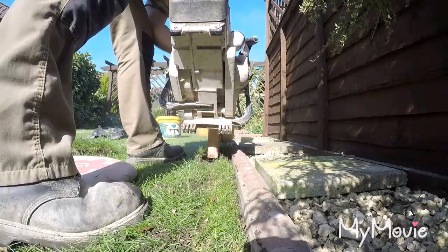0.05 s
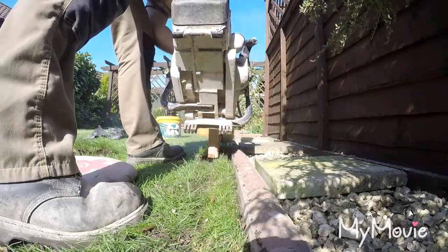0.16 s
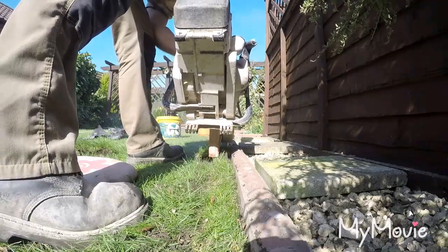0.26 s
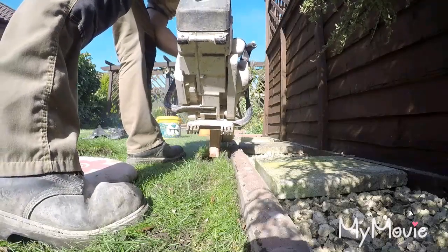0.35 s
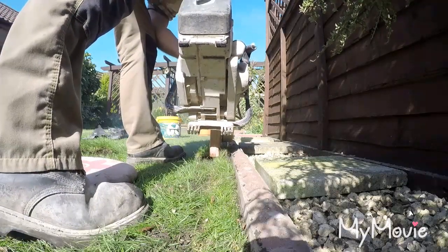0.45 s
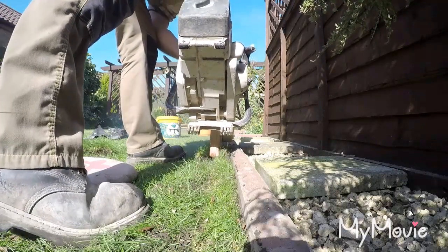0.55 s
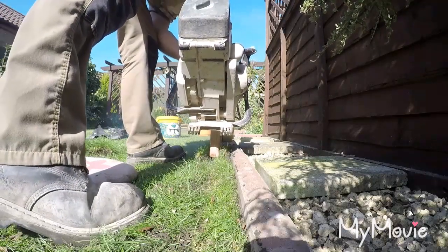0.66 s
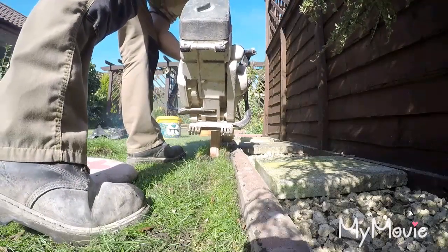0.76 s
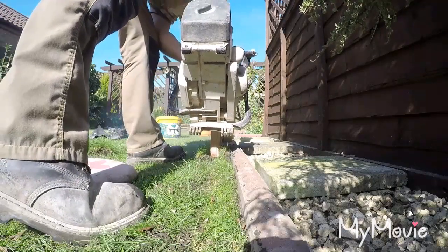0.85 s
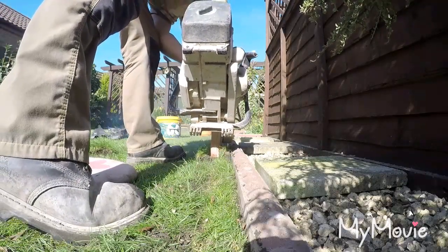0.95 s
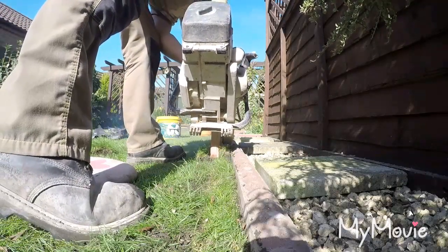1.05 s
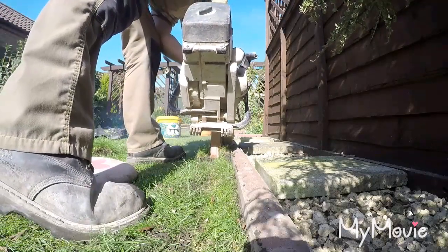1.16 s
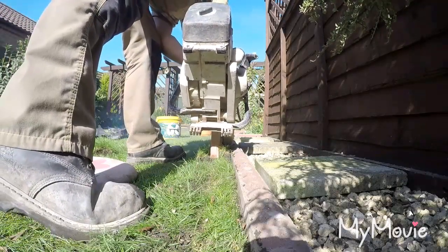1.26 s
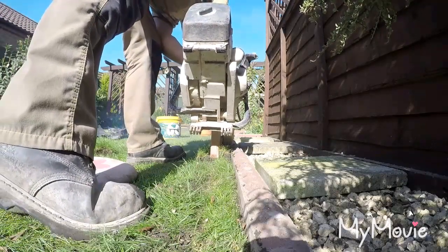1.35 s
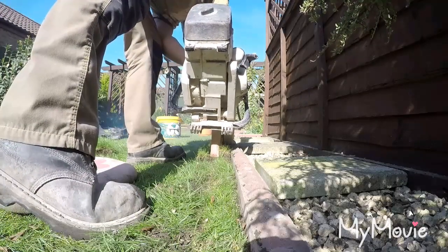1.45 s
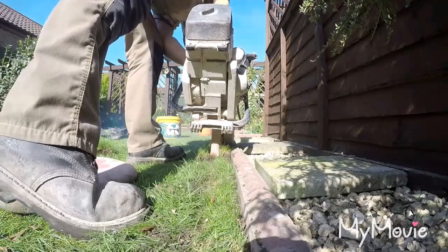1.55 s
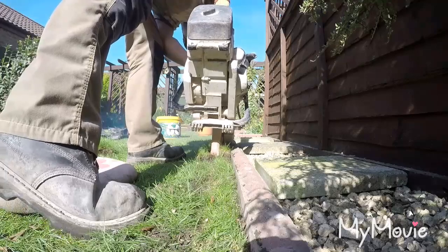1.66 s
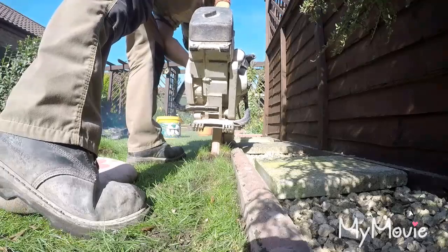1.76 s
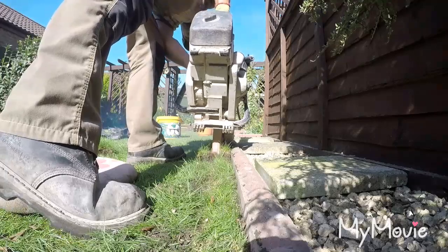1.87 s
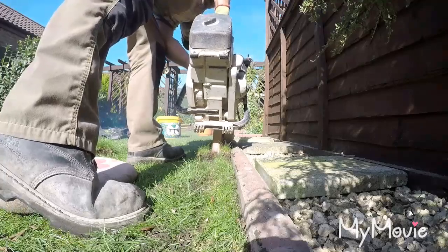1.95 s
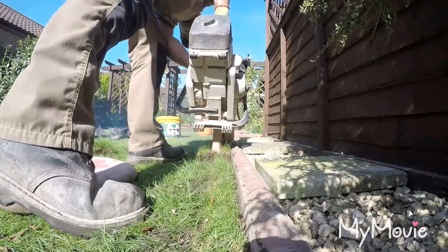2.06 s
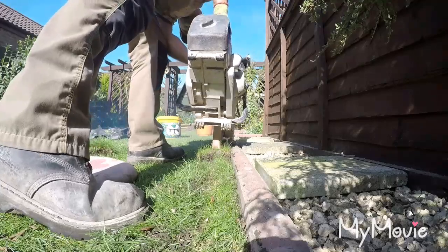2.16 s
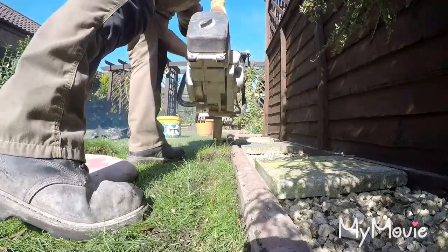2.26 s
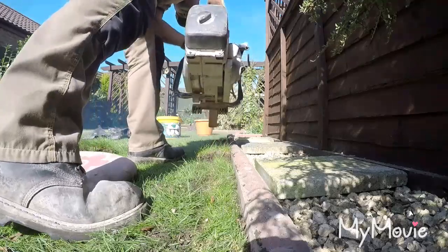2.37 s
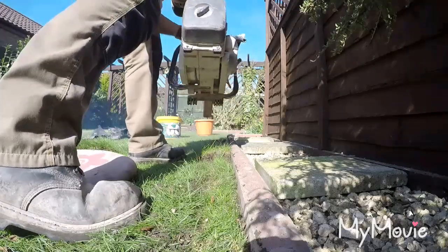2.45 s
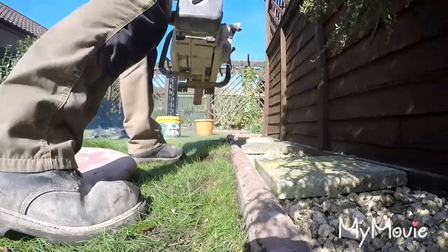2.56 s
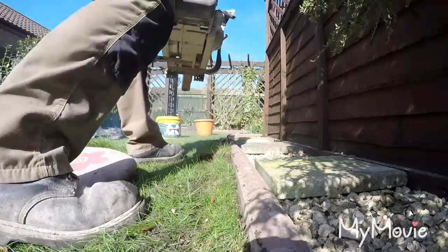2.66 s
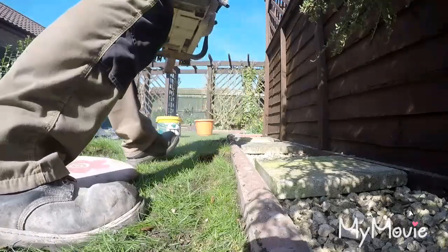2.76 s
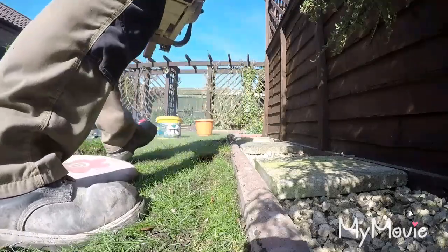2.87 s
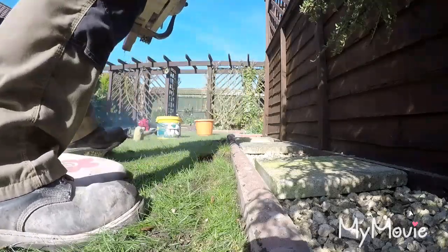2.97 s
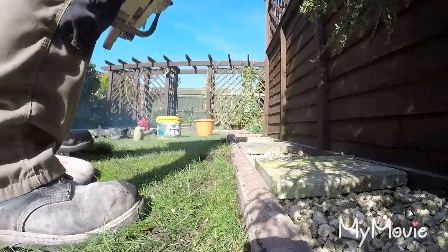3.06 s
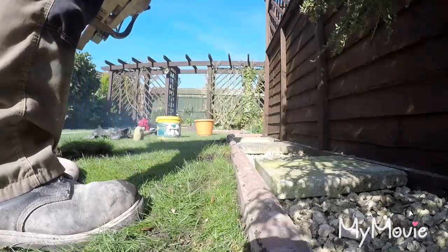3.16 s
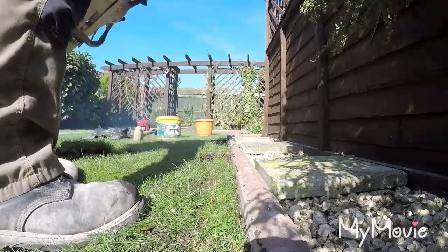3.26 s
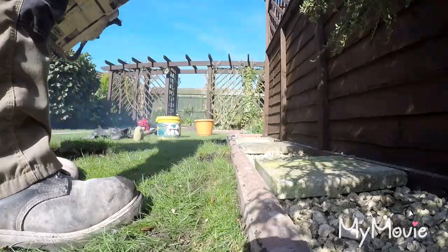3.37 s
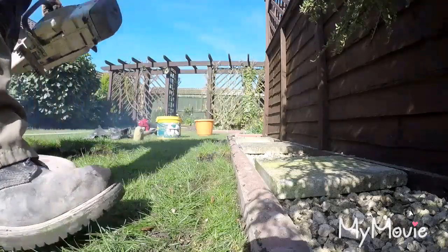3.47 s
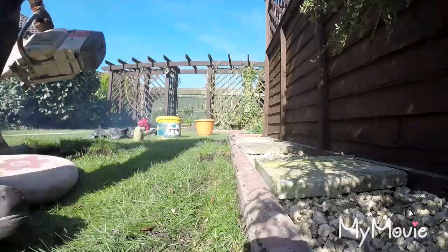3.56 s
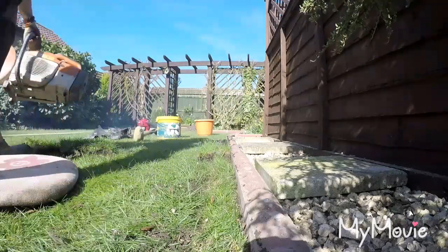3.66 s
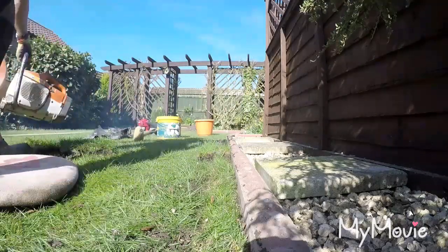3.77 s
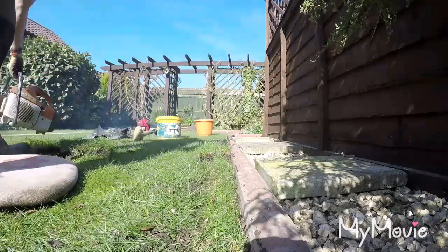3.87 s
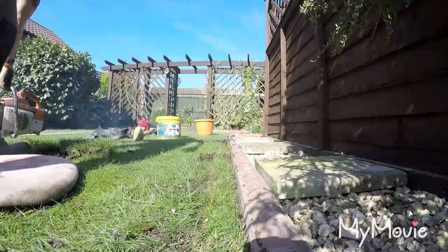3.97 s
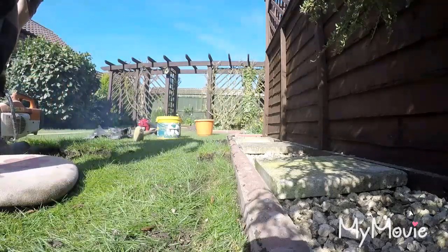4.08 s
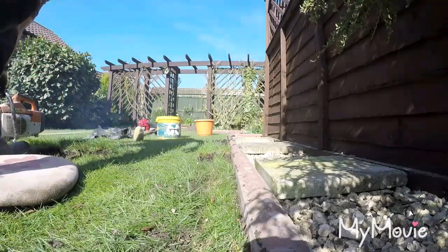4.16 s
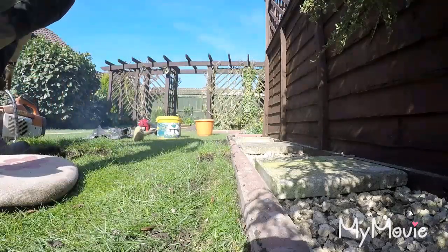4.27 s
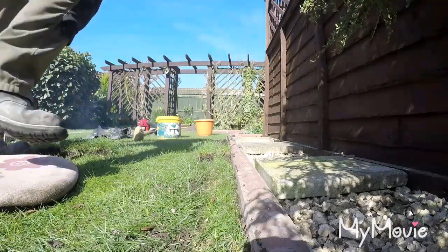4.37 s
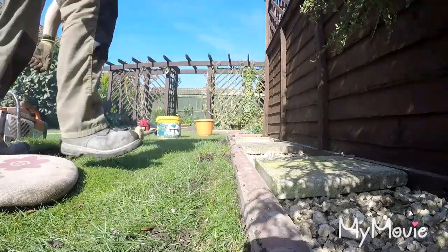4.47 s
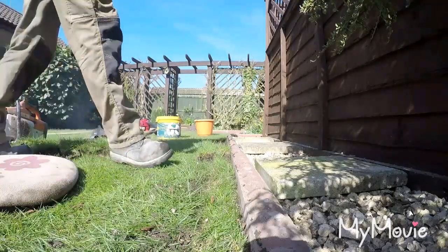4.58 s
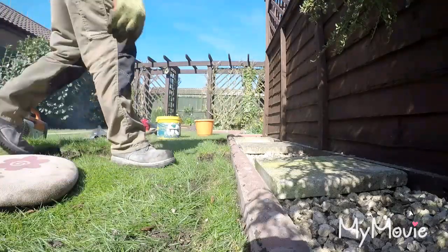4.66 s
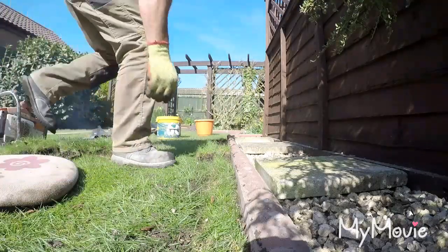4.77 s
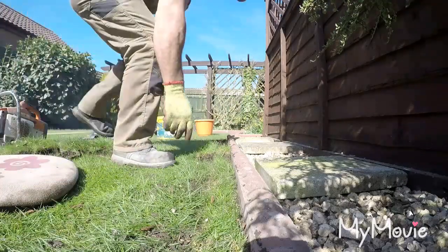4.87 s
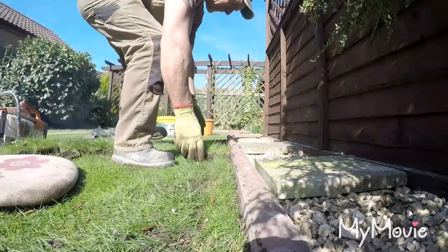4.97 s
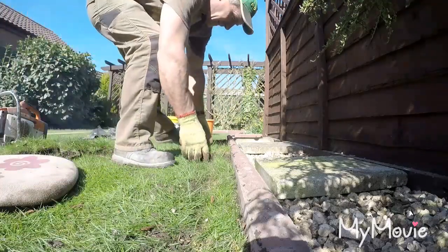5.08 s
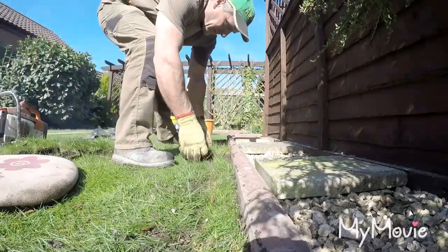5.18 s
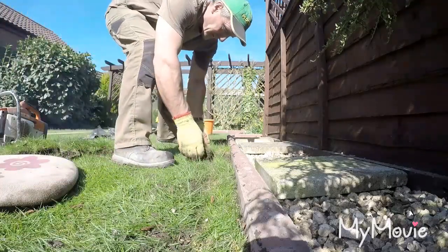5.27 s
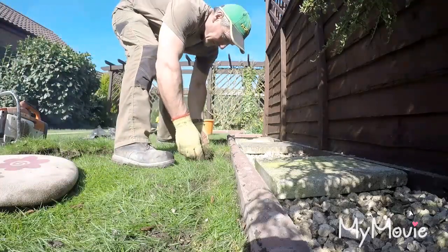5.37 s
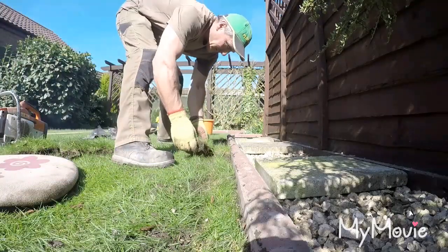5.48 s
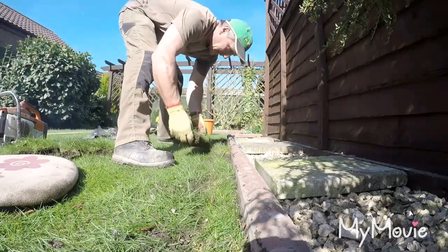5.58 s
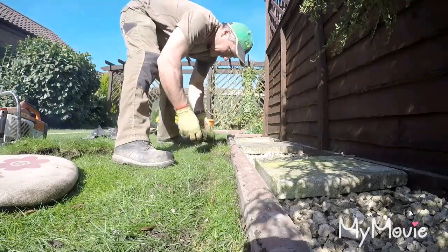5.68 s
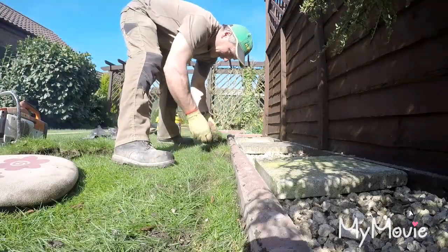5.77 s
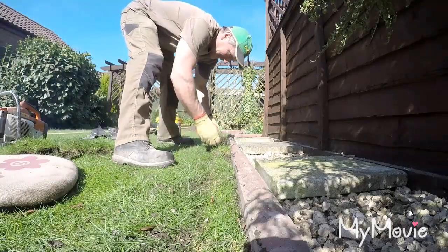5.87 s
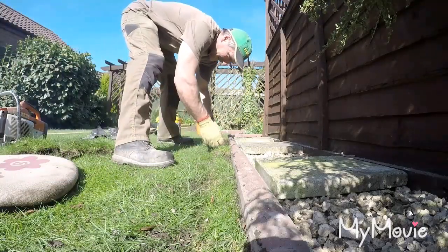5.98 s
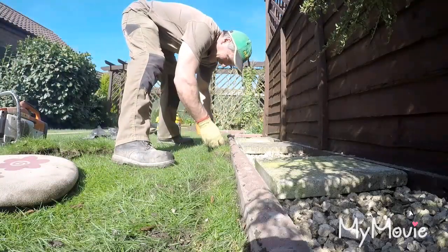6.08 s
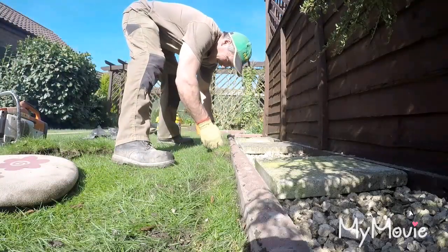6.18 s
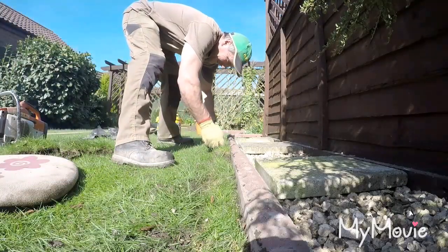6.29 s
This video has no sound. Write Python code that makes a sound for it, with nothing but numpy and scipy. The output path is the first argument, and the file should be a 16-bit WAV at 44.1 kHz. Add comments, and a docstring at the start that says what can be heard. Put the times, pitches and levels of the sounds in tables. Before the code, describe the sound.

A petrol disc cutter cuts concrete at full throttle, then winds down and idles with sharp, uneven pops.

```python
"""Two-stroke disc cutter: cut, coast, idle.

A petrol saw cuts concrete flat out by a wooden fence, firing every second turn: the exhaust barks,
the intake drones, the steel disc sings. The throttle shuts; the engine coasts unfired, puffing and
rattling, as the saw is carried aside. Left on the lawn, it idles in sharp uneven pops over a breeze."""
import sys
import numpy as np
from scipy import signal
from scipy.fft import rfft, irfft, next_fast_len
from scipy.io import wavfile

SR = 44100
rng = np.random.default_rng(int(sys.argv[2]) if len(sys.argv) > 2 else 0)


def transcribe(signal):
    """Save signal, clipped to [-1, 1], as a 16-bit WAV file at the path in sys.argv[1]."""
    frames = np.atleast_2d(signal).T
    limited = np.clip(frames, -1, 1)
    pcm = np.round(limited * 32767).astype(np.int16)
    wavfile.write(sys.argv[1], SR, pcm)


N = 279153
T = np.arange(N) / SR
TAPS = 8192
HZ = np.fft.rfftfreq(TAPS, 1 / SR)
FULL_SPEED_HZ, SHUT_S = 80, 2.14

# crank speed: t/s, f/Hz
CRANK_SPEED = [(0, 85.05), (.38, 86.12), (.62, 81.53), (.95, 80.8), (1.22, 78.37), (1.5, 81.18),
               (1.8, 85.6), (2.0, 86.32), (2.12, 89.21), (2.2, 83.73), (2.45, 75.81), (2.87, 63.84),
               (3.25, 44.81), (3.8, 30.4), (4.0, 40), (4.7, 34), (5.55, 34), (6.0, 39.5)]
# misfires at the rev limit: t/s
MISFIRES = [.111, .240, .297, 2.034, 2.067, 2.102, 2.113]
# idle firings: t/s, relative crack level/dB, relative thump level/dB
IDLE_FIRINGS = [(3.8013, -35, -45), (3.923, -24, -38), (4.122, -26, -33), (4.2571, -22, -28),
                (4.4107, -40, -37), (4.6434, -31, -32.5), (4.7592, -28.5, -31.5), (4.8456, -47, -40.5),
                (4.905, -23, -32), (5.02, -26.5, -32.5), (5.1188, -35, -44.5), (5.236, -29.5, -34),
                (5.327, -26, -31.5), (5.444, -24.5, -31.5), (5.5533, -21, -32.5), (5.6705, -20, -30),
                (5.8045, -16, -28), (5.9572, -16.5, -32.5), (6.0877, -16.5, -31.5), (6.261, -29, -34.5)]
# disc's bite over a light cut; saw facing the listener (both weighted per part): t/s, level/dB
BITE = [(0, 9.5), (.12, 10), (.21, 8.5), (.25, 1.5), (.47, 5.5), (.62, 0), (1.35, 1.5), (1.75, 7.5),
        (2.1, 1)]
FACING = [(2.4, 1.5), (2.66, -3), (2.97, 4), (3.25, 1), (3.5, 0), (3.85, -0.5), (4.12, -1), (4.7, -1.5),
          (6.2, 0)]
# coasting fan whistle: t/s, f/Hz, level/dB
FAN_WHISTLE = [(2.15, 3210, -76), (2.33, 2854, -45), (2.45, 2710, -33), (2.6, 2690, -36.5),
               (2.75, 2448, -37), (2.95, 2390, -40.5), (3.15, 2376, -44), (3.4, 2210, -62)]
# disc rasps on the swing and set-down: peak t/s, rise/s, decay/s, f/Hz, width/Hz, level/dB
SWING_RASPS = [(2.98, .14, .38, 3870, 230, -38), (3.97, 0.057, .27, 3500, 520, -43)]
# body booms on the downswing: centre t/s, half length/s, level/dB
BOOMS = [(3.629, 0.017, -38), (3.725, 0.039, -33)]
# crank harmonics: order, relative level/dB
INTAKE_ORDERS = [(1, 8), (2, 6), (3, -31), (4, -15.5), (5, -16), (6, -10.5), (7, -21)]
PUMP_ORDERS = [(3, -3), (4, 2.5), (5, -2), (6, -7), (7, -12.5), (8, -11.5), (9, -19), (10, -22.5),
               (11, -10), (12, -24), (13, -10), (14, -27), (15, -11.5)]
# exhaust spectra, flat out and idling: f/Hz, relative level/dB
EXHAUST_THUD = [(5, -19), (42, -4), (125, 2.5), (210, 0.5), (300, -6), (380, -17.5), (440, -7.5), (540, -8),
                (680, -19), (900, -13.5), (1300, -25), (2500, -40)]
EXHAUST_FRONT = [(300, -28.5), (680, -22.5), (830, 3.5), (1000, 5.5), (1230, 6), (1400, -19), (1950, -33),
                 (2400, 9.5), (3500, -5), (8000, -29)]
EXHAUST_BARK = [(300, -28), (680, -24), (850, -5.5), (1200, -7), (1400, -17), (1950, -42), (2400, 2.5),
                (3000, 1), (3900, 3), (4400, 0), (5200, 3), (6500, -9.5), (10000, -9.5), (12500, -9.5),
                (15000, -25)]
IDLE_THUMP = [(5, -45), (30, -10), (70, 7.5), (150, 0), (300, -4), (430, 0), (570, -7), (750, -18.5),
              (1200, -30), (2500, -76)]
IDLE_CRACK = [(300, 11), (800, -1.5), (1150, -4.5), (1450, -11), (2200, -7), (3300, -30), (5000, -7.5),
              (7000, -15), (8200, -10.5), (11000, -7), (15000, -12)]
# machinery and air spectra: f/Hz, relative level/dB
RATTLE_HELD = [(1060, -30.5), (1800, -8.5), (2510, -1), (2830, -4), (3180, -0.5), (3500, -5.5), (3800, -1),
               (3970, -4), (4320, -14), (4710, -6), (5360, -16), (6500, -20.5), (8450, -42), (14300, -120)]
RATTLE_ON_LAWN = [(1400, -23.5), (1900, -4), (2700, -2), (3000, -2), (3150, 11.5), (3350, -1.5),
                  (3900, 1.5), (4300, -10), (4750, 1.5), (5300, -5), (7000, -37)]
HISS = [(3000, -49), (5000, 5), (6800, 4.5), (8500, -1.5), (10000, -2.5), (12500, -1.5), (14000, -10.5),
        (16000, -38)]
CASING = [(200, -13), (450, -7), (680, -14.5), (880, -4.5), (1000, -6), (1170, 2.5), (1400, -21),
          (2600, -17.5), (5000, -47)]
SHUDDER = [(10, -53), (50, -8), (100, -9), (170, 0.5), (250, 3), (350, -2.5), (440, -4), (620, -22),
           (900, -32), (2000, -41)]
BREEZE = [(5, -35), (20, -10), (35, -5), (60, -8), (120, -10), (250, -14.5), (700, -31), (2000, -52)]
# resonances: f/Hz, half width/Hz, relative level/dB; the last casing mode is the ring of the gap by the fence
CASING_MODES = [(857, 96, -4), (1166, 120, -2.5), (1655, 53, 9)]
MUFFLER_MODES = [(1770, 49, -8), (2606, 180, 8), (3120, 81, 16.5), (3660, 170, 9.5), (4600, 140, 10.5),
                 (5590, 200, 2), (6990, 290, 6), (9650, 450, -3.5)]
DISC_MODES = [(872.4, 8.6, 1), (1706, 8.9, 3.5), (2430, 31, -2), (3244, 15, 7), (3700, 19, -6),
              (3740, 43, -8), (4015, 9.1, 8.5), (4790, 15, 5.5), (5530, 24, -1), (5550, 7.7, -18),
              (6555, 23, -7), (8380, 19, -6.5), (12360, 260, -15)]
JINGLE_MODES = [(2590, 38, -6.5), (3150, 23, 7), (3330, 15, 3.5), (3700, 17, -3), (3840, 34, 5),
                (4610, 46, -5), (5630, 28, -6), (6760, 58, -6.5)]


def exhaust(turns, rested_db=4):
    """Each firing thuds, barks and rings the casing and the gap by the fence; the fuller charge after a misfire
    hits harder."""
    times = firings(turns)
    thud_spread, blow_spread, gust_spread = rng.standard_normal((len(times), 3)).T
    gap_turns = np.r_[2, np.diff(np.interp(times, T, turns))]
    charge_db = rested_db * np.log2(gap_turns / 2)
    bite_db = np.interp(times, T, curve(BITE))
    thud = colour(clicks(times - .0008, amp(-3 + 1.18 * thud_spread)), slope(EXHAUST_THUD))
    blows = clicks(times - .0004, amp(-34 + charge_db - .051 * bite_db + 1.8 * blow_spread))
    pressure = amp(24) * blows
    front = colour(pressure, slope(EXHAUST_FRONT))
    ring = colour(pressure + burst(blows, .0009, .004) * noise(), peaks(CASING_MODES))
    gusts = clicks(times - .0006, amp(-28 + .25 * charge_db + .16 * bite_db + 2 * gust_spread))
    jet = amp(3.5) * burst(gusts, .00055, .0031) + amp(-1) * burst(gusts, .0028, .0076)
    bark = ringing(colour(jet * noise(), slope(EXHAUST_BARK)), db=-1.5, decay_s=.0022)
    upstrokes = np.roll(gusts, -round(.0054 * SR))  # piston scuffs just before firing
    scuff = colour(amp(-2.5) * burst(upstrokes, .0011, .0073) * noise(), slope(RATTLE_HELD))
    return thud + front + ring + bark + scuff


def intake(turns, lead_turns=.245, octave_db=15, starve_s=.094):
    """The open intake drones on every turn, louder with speed, and starves as the throttle shuts."""
    angle = 2 * np.pi * (turns + lead_turns)
    drone = sum(amp(db) * np.cos(round(order) * angle) for order, db in INTAKE_ORDERS)
    air = np.sqrt(np.clip((SHUT_S - T) / starve_s + .14, 0, 1))
    return evened(drone) * amp(-29 + octave_db * octaves() + .5 * wander(17)) * air


def idle_pops():
    """Each lone firing: a pressure thump and a gas crack that rings the muffler. The fence echoes."""
    times, crack_db, thump_db = np.transpose(IDLE_FIRINGS)
    thump = colour(clicks(times + .00047, amp(thump_db + 22)), slope(IDLE_THUMP))
    blows = clicks(times, amp(crack_db))
    jet = amp(-3.5) * burst(blows, .0008, .0022) + amp(-10) * burst(blows, .0021, .012)
    front = amp(.5) * clicks(times + .00076, amp(crack_db))
    crack = colour(front + jet * noise(), slope(IDLE_CRACK) + peaks(MUFFLER_MODES))
    return echo(thump + crack, delay_s=.0095, db=-24)


def disc(turns, fade_db_per_s=45):
    """Rubbed by the cut and shaken by firings, the steel disc sings at its modes; fades once lifted."""
    shaken = .5 + burst(clicks(firings(turns), .68), .00049, .0055)
    level_db = -35 + curve(BITE) - fade_db_per_s * np.maximum(T - SHUT_S, 0)
    return colour(shaken * noise(), peaks(DISC_MODES)) * amp(level_db)


def disc_rasp(turns, hz=3845, octave_db=14):
    """The spinning disc rasps, jolted by full-throttle firings and swelling as the saw is swung."""
    kicks = burst(clicks(firings(turns) - .001, .84), .0013, .0045)
    jolt = 1 + throttle() * (1.9 * kicks - .3)
    level_db = -46 + 11.5 * throttle() + .12 * curve(BITE) + octave_db * octaves()
    rasp = jolt * noise_band(hz, width_hz=220) * amp(level_db)
    for peak_s, rise_s, decay_s, swing_hz, width_hz, db in SWING_RASPS:
        swell = np.exp(-((T - peak_s) / np.where(T < peak_s, rise_s, decay_s)) ** 2)
        rasp += noise_band(swing_hz, width_hz) * amp(db) * swell
    return rasp


def machinery(turns, shut_slap=1.3, open_slap=.32, slap_turns=.19):
    """Piston slap, belt and fan: noise pulsing unevenly each turn, deepest off the throttle."""
    turn_index = np.floor(turns - turns.min() // 1).astype(int)
    force = 2 * rng.random(N)[turn_index] * (shut_slap + (open_slap - shut_slap) * throttle())
    pulse = evened(1 + force * np.exp(-(turns % 1) / slap_turns)) * amp(wander(140))
    down = on_lawn()  # another side faces the listener
    rattle = np.sqrt(1 - down) * colour(pulse * noise(), slope(RATTLE_HELD))
    rattle += np.sqrt(down) * colour(pulse * noise(), slope(RATTLE_ON_LAWN))
    rattle *= part_gain(db=-35.5, octave_db=9.5, bite=.8, facing=.68, cut_db=-3.5, lawn_db=-5.5)
    hiss = ringing(colour(pulse * noise(), slope(HISS)), db=.5, decay_s=.0061)
    hiss *= part_gain(db=-49, octave_db=8.5, bite=1.28, facing=.51, cut_db=4, lawn_db=-2.5)
    casing = colour(pulse * noise(), slope(CASING))
    casing *= part_gain(db=-45.5, octave_db=15.5, bite=.3, facing=.51, cut_db=2.5, lawn_db=4.5)
    fence_ring = colour(pulse * noise(), peaks(CASING_MODES[-1:]))
    fence_ring *= part_gain(db=-46, octave_db=13.5, bite=.71, facing=2.2, cut_db=-3.5, lawn_db=-9.5)
    return rattle_jolts() * ringing(rattle, db=-4, decay_s=.01) + hiss + casing + fence_ring


def pumping(turns, box_hz=275, box_width_hz=55, hum_cutout_hz=50):
    """Throttle shut: the piston puffs unburnt air; the muffler box lifts orders gliding past it."""
    crank_hz = speed_hz()
    angle = 2 * np.pi * (turns + .0022 * wander(50))
    lawn_rocking = ramp(4.81, .31) * amp(-43 + 2.2 * wander(2.2))
    fundamental = (amp(-43 + 11 * octaves()) + lawn_rocking) * np.cos(angle)
    hum_gain = np.clip((crank_hz - hum_cutout_hz) / 6, .15, 1)
    hum = amp(-36.5 + 15 * octaves()) * hum_gain * np.cos(2 * angle)
    slowness = np.clip((FULL_SPEED_HZ - crank_hz) / 30, 0, 1)
    upper = 0
    for order, db in PUMP_ORDERS:
        box_db = 4 * np.exp(-((order * crank_hz - box_hz) / box_width_hz) ** 2)
        dulling_db = 1.2 * slowness * max(order - 5, 0)
        gain = amp(db + box_db - dulling_db + .63 * wander(11))
        upper += gain * np.cos(round(order) * angle - order ** 2 / 4)
    return (fundamental + hum + amp(-49.5) * upper) * (1 - throttle())


def shaking(turns, below_hz=55):
    """At low speed the saw shudders on its mounts each turn and loose parts jingle."""
    times = turn_times(turns)
    looseness = np.interp(times, T, np.clip((below_hz - speed_hz()) / 10, 0, 1))
    size, lag, hit = rng.random((len(times), 3)).T
    shudder = colour(clicks(times + .006 * lag, looseness * (.43 + size)), slope(SHUDDER))
    taps = clicks(times + .0123 * lag, looseness * hit ** 2)
    jingle = colour(burst(taps, .00017, .0015) * noise(), peaks(JINGLE_MODES))
    return amp(-24) * shudder + amp(-29) * jingle


def fan_whistle():
    """The coasting fan's breathy, falling whistle."""
    return noise_band(curve(FAN_WHISTLE), width_hz=190) * amp(curve(FAN_WHISTLE, column=2))


def body_booms(hz=131):
    """Brief hollow tones from the saw's body as it is swung down."""
    swells = sum(amp(db) * np.exp(-((T - centre_s) / half_s) ** 2) for centre_s, half_s, db in BOOMS)
    return swells * amp(1.6 * wander(27)) * np.sin(2 * np.pi * hz * T)


def chip(at_s=.4995, hz=2250, db=-10, decay_s=.0026):
    """A concrete chip pings off the guard."""
    age_s = np.maximum(T - at_s, 0)
    return amp(db) * np.sin(2 * np.pi * hz * age_s) * np.exp(-age_s / decay_s)


def breeze():
    """Low, lumpy outdoor rumble, growing in the second half."""
    level_db = np.interp(T, [3, 4.3], [-58, -50])
    return colour(noise(), slope(BREEZE)) * amp(level_db + 1.8 * wander(6))


def speed_hz(sag_hz_per_s=31.4):
    """Crank rate; each idle firing kicks it up, friction slows it until the next."""
    fired_s = np.array(IDLE_FIRINGS)[:, 0]
    following = np.clip(np.searchsorted(fired_s, T), 1, len(fired_s) - 1)
    middle_s = (fired_s[following - 1] + fired_s[following]) / 2
    idling = (T > fired_s[0]) & (T < fired_s[-1])
    return curve(CRANK_SPEED) + sag_hz_per_s * (middle_s - T) * idling


def crank_turns(start_turns=-.405, coast_end_s=3.58):
    """Crank angle, slipped so each idle firing falls on a whole turn."""
    turns = start_turns + np.cumsum(speed_hz()) / SR
    fired_s = np.array(IDLE_FIRINGS)[:, 0]
    slip = np.unwrap(np.r_[0, np.interp(fired_s, T, turns) % 1], period=1)
    return turns - np.interp(T, np.r_[coast_end_s, fired_s], slip)


def turn_times(turns):
    return T[1:][np.diff(np.floor(turns)) > 0]


def firings(turns):
    """Firing times at the rev limit: every second turn, later after a misfire."""
    fired_s, rested = [], True
    for at_s in turn_times(turns):
        misfire = np.abs(at_s - np.array(MISFIRES)).min() <= .006
        burns = rested and .01 < at_s < SHUT_S and not misfire
        if burns:
            fired_s.append(at_s)
        rested = not burns
    return np.array(fired_s)


def octaves():
    """Crank rate in octaves above full speed."""
    return np.log2(np.maximum(speed_hz(), 1) / FULL_SPEED_HZ)


def throttle():
    """1 open, 0 shut."""
    return 1 - ramp(SHUT_S, .032)


def on_lawn():
    """0 held, 1 resting on the grass."""
    return ramp(4.21, .64)


def part_gain(db, octave_db, bite, facing, cut_db, lawn_db):
    """A moving part's gain: rises with speed, weights bite and facing, shifts in the cut and on grass."""
    load_db = throttle() * (cut_db + bite * curve(BITE))
    return amp(db + octave_db * octaves() + load_db + facing * curve(FACING) + lawn_db * on_lawn())


def rattle_jolts(jolt_db=3, decay_s=.065):
    """Rattle gain: jumps at each idle firing, wavers off the throttle."""
    hardest_db = np.array(IDLE_FIRINGS)[:, 1].max()
    jolts = sum(np.exp(-np.abs(T - at_s) / decay_s) * (T > at_s) * np.sqrt(amp(crack_db - hardest_db))
                for at_s, crack_db, _ in IDLE_FIRINGS)
    return amp(jolt_db * jolts + 1.3 * wander(22) * (1 - throttle()))


def ringing(x, db, decay_s):
    """The metal shell adds dense, short-lived modes."""
    modes = rng.standard_normal(TAPS) * np.exp(-T[:TAPS] / decay_s)
    ring = signal.oaconvolve(x, modes / np.linalg.norm(modes))[:N]
    return (x + amp(db) * ring) / np.hypot(1, amp(db))


def amp(db):
    return 10 ** (np.asarray(db) / 20)


def evened(x):
    """Scaled to unit RMS."""
    return x / np.sqrt(np.mean(x ** 2) + 1e-20)


def ramp(centre_s, length_s):
    return np.clip((T - centre_s) / length_s + .5, 0, 1)


def curve(rows, column=1):
    """Table column, linear in time."""
    rows = np.array(rows)
    return np.interp(T, rows[:, 0], rows[:, column])


def noise():
    return rng.standard_normal(N)


def wander(below_hz):
    """Low-passed noise, unit RMS."""
    size = next_fast_len(N, True)
    passband = np.fft.rfftfreq(size, 1 / SR) < below_hz
    return evened(irfft(rfft(rng.standard_normal(size)) * passband, size)[:N])


def noise_band(hz, width_hz):
    """Flickering noise, width_hz either side of a steady or gliding pitch."""
    angle = 2 * np.pi * np.cumsum(hz * np.ones(N)) / SR
    band = wander(width_hz) * np.cos(angle) + wander(width_hz) * np.sin(angle)
    return evened(band) * amp(wander(71))


def slope(points):
    """Spectrum gain, interpolated in log frequency."""
    hz, db = np.transpose(points)
    return amp(np.interp(np.log(HZ + 1), np.log(hz), db))


def peaks(modes):
    """Summed resonance gain."""
    return sum(amp(db) / (1 + ((HZ - hz) / width_hz) ** 2) for hz, width_hz, db in modes)


def colour(x, gain):
    """Minimum-phase filter, unit energy."""
    log_gain = np.log(np.maximum(gain / gain.max(), 1e-5))
    log_response = signal.hilbert(np.r_[log_gain, log_gain[-2:0:-1]]).conj()
    ring = np.fft.ifft(np.exp(log_response)).real[:TAPS // 2]
    return signal.oaconvolve(x, ring / np.linalg.norm(ring))[:N]


def clicks(times_s, sizes):
    samples = np.clip(np.round(times_s * SR).astype(int), 0, N - 1)
    return np.bincount(samples, sizes * np.ones(len(times_s)), N)


def burst(impulses, rise_s, decay_s):
    """Rise-and-decay envelope after each impulse."""
    t = T[:TAPS]
    return signal.oaconvolve(impulses, (1 - np.exp(-t / rise_s)) * np.exp(-t / decay_s))[:N]


def echo(x, delay_s, db):
    return x + amp(db) * np.interp(T - delay_s, T, x, left=0)


def scene():
    """The saw from the lawn beside it, mono."""
    turns = crank_turns()
    engine = intake(turns) + exhaust(turns) + pumping(turns)
    engine += machinery(turns) + shaking(turns) + idle_pops()
    spinning = disc(turns) + disc_rasp(turns) + fan_whistle()
    return (engine + spinning + body_booms() + chip() + breeze())[None]


def record(dry):
    """Low-pass at 15.5 kHz."""
    lowpass = signal.firwin(255, 15500, window=("kaiser", 9), fs=SR)
    return signal.oaconvolve(dry, lowpass[None], "same")


dry = scene()
out = record(dry)
transcribe(out)
```